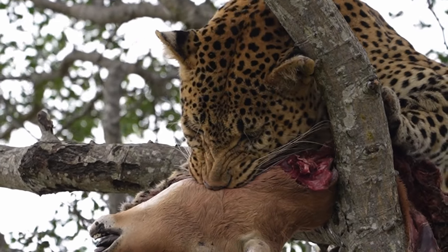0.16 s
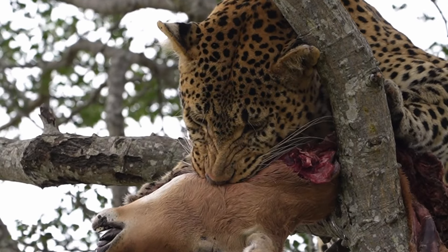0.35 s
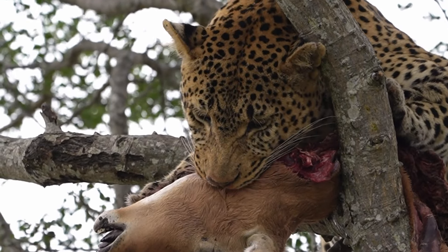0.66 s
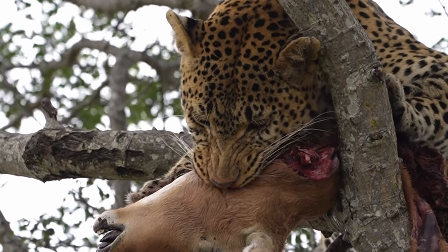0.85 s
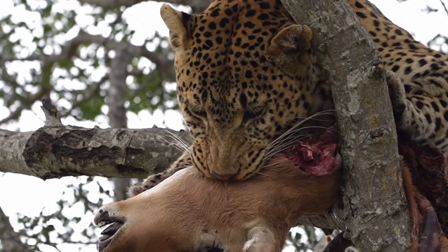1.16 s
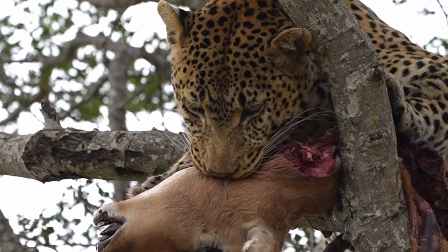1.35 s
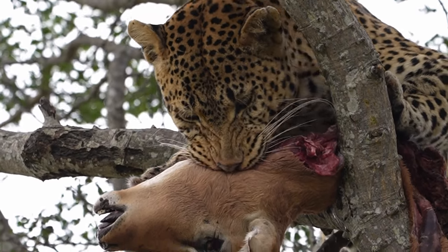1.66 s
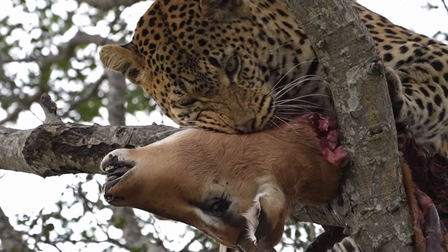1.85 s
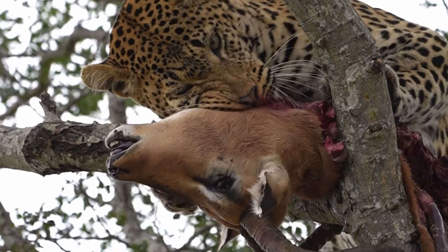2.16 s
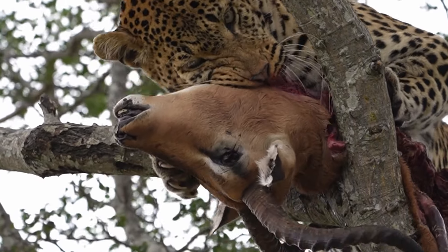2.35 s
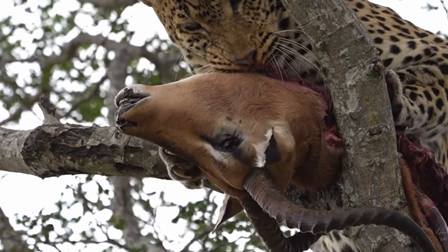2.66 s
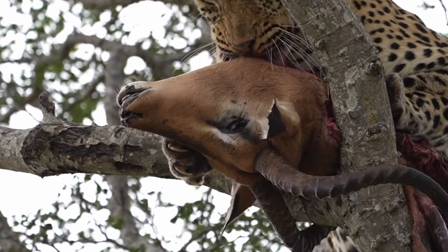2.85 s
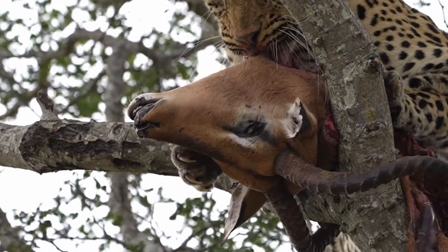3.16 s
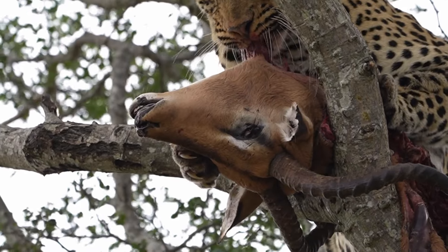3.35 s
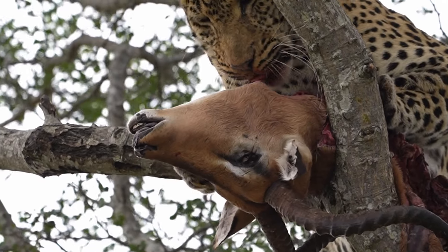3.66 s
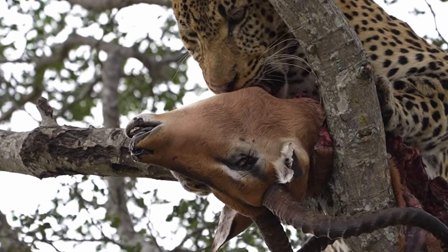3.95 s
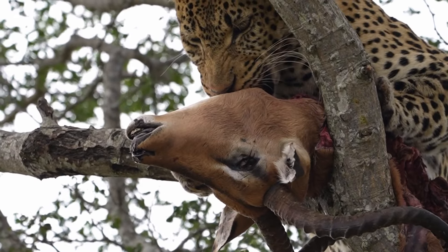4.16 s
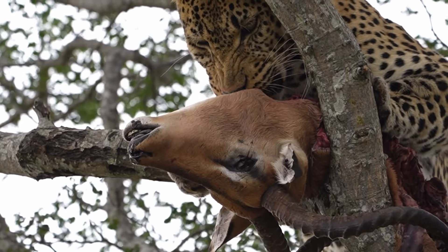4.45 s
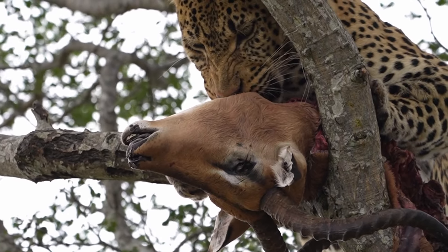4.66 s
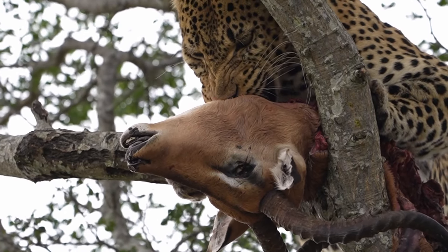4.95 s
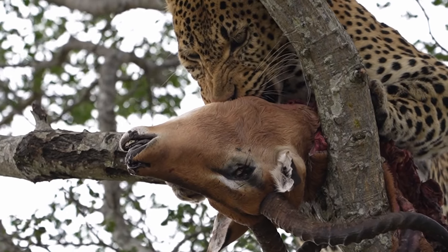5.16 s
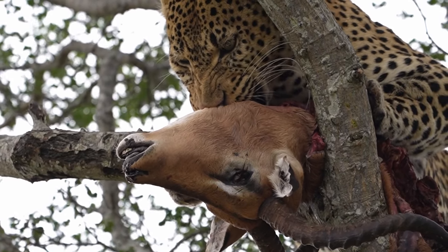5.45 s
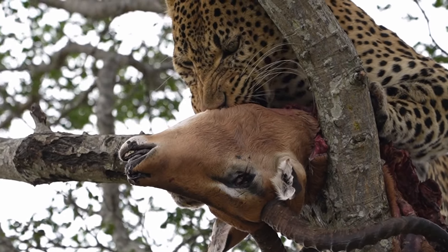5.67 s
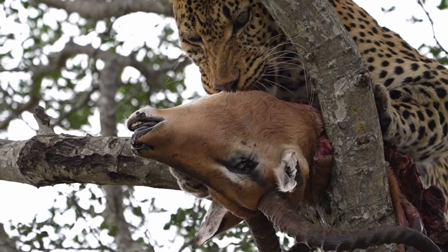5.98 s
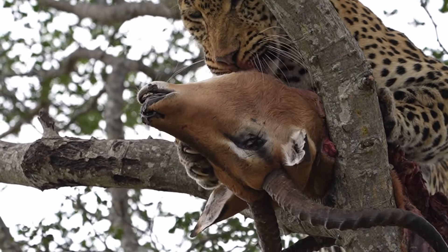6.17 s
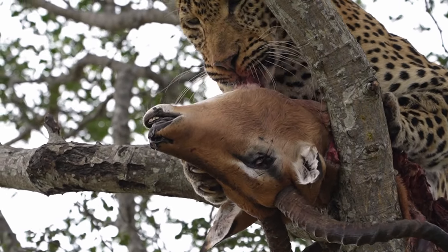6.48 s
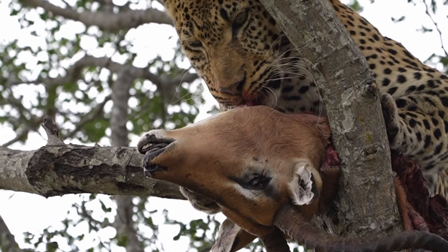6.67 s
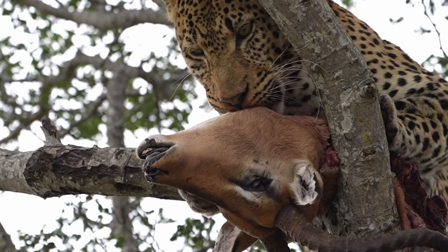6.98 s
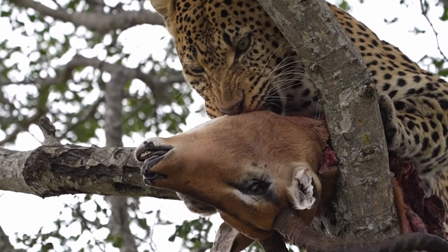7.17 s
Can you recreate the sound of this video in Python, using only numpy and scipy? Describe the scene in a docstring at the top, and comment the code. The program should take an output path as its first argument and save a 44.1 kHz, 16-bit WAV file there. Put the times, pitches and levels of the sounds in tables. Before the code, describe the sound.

Birds scold close by among trees, over a distant cheeping flock and a faint airy hiss that both swell and fade. The first second is loudest: hoarse chattering notes, a short falling nasal wail, harsh churrs and one bright squeak at about 0.5 seconds. Around 1 second, quick sliding notes, hollow clucks and a trill join, followed by a small bird's high chips and a thin whistle. After a brief lull, a second wail falls at 2.2 seconds, then come trills, clucks and rasps until about 3.5 seconds. Two more wails sink one after the other from 3.9 to 5.2 seconds, fraying as they drop, with high chips above. The calls thin out briefly, then thicken near 6 seconds with a last long wail, a whistle, churrs and chatter until about 7.3 seconds. The near calls have a short echo, and the sound has almost no bass.

```python
"""Birds mob a cat in a tree. From the start, close birds chatter over a far scolding flock and airy hiss.
One gives the first of five falling nasal wails; harsh churrs and a squeak follow. Quick slides, clucks
and trills join at about 1 s, then a small bird's high chips and whistles; the calls recur until 7.3 s.
Voiced calls are membrane overtones shaped by throat and beak. Trunks throw a short echo, and the
microphone cuts the bass."""
import sys
import numpy as np
from scipy import signal
from scipy.io import wavfile
from scipy.ndimage import uniform_filter1d

SR = 44100
rng = np.random.default_rng(int(sys.argv[2]) if len(sys.argv) > 2 else 0)


def to_wav(sig):
    """Store sig (one row per channel, or 1-D mono) as 16-bit WAV at the path in sys.argv[1].

    Samples outside -1..1 are clipped; the rate is SR.
    """
    pcm = np.clip(np.atleast_2d(sig), -1, 1) * 32767
    pcm = np.round(pcm).astype(np.int16)
    wavfile.write(sys.argv[1], SR, pcm.T)  # frames by channels


N = 322812

# Throat response for chatter and churrs. Each row: frequency in Hz, gain in dB.
CHATTER_THROAT = [(500, -16.5), (1200, -3), (2500, -3.5), (4000, -5), (6000, -14), (9000, -26),
                  (15000, -81)]


def undb(db):
    """Decibels to gain."""
    return 10 ** (np.asarray(db) / 20)


def unit(x):
    """Scale to rms 1."""
    return x / np.sqrt(np.mean(x ** 2))


def band(x, hz, width_hz):
    """Second-order resonance."""
    return signal.lfilter(*signal.iirpeak(hz, hz / width_hz, fs=SR), x)


def narrow_noise(count, hz, width_hz):
    """Noise passed twice through one resonance; rms 1."""
    return unit(band(band(rng.standard_normal(count), hz, width_hz), hz, width_hz))


def wobble(rate_hz, shape):
    """Smooth random drift at about rate_hz; rms 1."""
    width = max(int(SR / rate_hz), 1)
    return unit(uniform_filter1d(uniform_filter1d(rng.standard_normal(shape), width), width))


def sine(hz):
    """Sine following a per-sample pitch."""
    return np.sin(2 * np.pi * np.cumsum(hz) / SR)


def span(rows):
    """Timed rows to sample indices, per-sample columns and a 2 ms fade at each end."""
    times_s, *columns = np.transpose(rows)
    i = np.arange(int(times_s[0] * SR), min(int(times_s[-1] * SR), N))
    fade = np.clip(np.minimum(i - i[0], i[-1] - i) / (0.002 * SR), 0, 1)
    return i, [np.interp(i / SR, times_s, column) for column in columns], fade


def contour(start_s, length_s, turn, from_hz, turn_hz, to_hz, db, swell_db, beak_hz, beak_db,
            beak_end_hz=None):
    """Rows of one call for voice(): pitch turns once, level tilts by the swell and drops at both ends."""
    u = np.linspace(0, 1, 41)
    hz = np.interp(u, [0, np.clip(turn, 0, 1), 1], [from_hz, turn_hz, to_hz])
    level_db = db + swell_db * (u - .5) - 4.5 * np.abs(2 * u - 1) ** 3.3
    beak_path_hz = np.linspace(beak_hz, beak_end_hz or beak_hz, len(u))
    return np.transpose([start_s + length_s * u, hz, level_db, beak_path_hz, np.full_like(u, beak_db)])


def voice(calls, throat, beak_width_hz, rough, beats=None, fry_hz=1.):
    """Membrane overtones through a fixed throat and a moving beak; roughness shakes pitch and gains."""
    hop = 16  # samples per gain update
    throat_hz, throat_db = np.transpose(throat)
    out = np.zeros(N)
    for n, rows in enumerate(calls):
        i, (hz, *controls), fade = span(rows)
        db, beak_hz, beak_db = uniform_filter1d(controls, size=350)  # muscles cannot jump
        fray = np.clip(rough + (fry_hz / hz) ** 4, 0, .95)  # a slack membrane frays at low pitch
        if beats:  # trill: quick rise, slow fall; the voice thins during the rise
            reference_s, rate_hz, swing = beats[n]
            beat_rad = 2 * np.pi * rate_hz * (i / SR - reference_s)
            hz = hz * (1 + swing * uniform_filter1d(signal.sawtooth(beat_rad - .6 * np.pi, .3), size=150))
            db = db + 5 * np.sin(beat_rad + .3)
        hz = hz * (1 + .12 * fray ** 2 * wobble(350, len(i)))
        k = np.arange(1, int(throat_hz[-1] / hz.min()) + 1)[:, None]
        partial_hz, hoarse = k * hz[::hop], fray[::hop]
        gain = undb(np.interp(np.log(partial_hz), np.log(throat_hz), throat_db, right=-99))
        detune = (partial_hz - beak_hz[::hop]) / beak_width_hz
        gain *= 1 + undb(beak_db[::hop]) / (1 + detune ** 2) ** 1.3
        gain /= np.sqrt(np.sum(gain ** 2, axis=0) / 2)
        gain *= np.sqrt(1 - hoarse ** 2) + hoarse * wobble(hop * 425, gain.shape)
        gain *= undb(2.92 * wobble(hop * 23.4, gain.shape))  # each overtone swells on its own
        gain = uniform_filter1d(np.repeat(gain, hop, axis=1), hop)[:, :len(i)]
        phase_rad = 2 * np.pi * np.cumsum(hz) / SR
        tone = np.sum(gain * np.sin(k * phase_rad + k ** 2), axis=0)
        out[i] += tone * undb(db) * fade
    return out


def chatter():
    """Short hoarse notes, each with one pitch turn."""
    # Each row: start and length in seconds, place of the turn 0-1, pitch at start, turn and end in Hz,
    # level and swell in dB, beak resonance in Hz, its strength in dB.
    notes = [ (0.0, 0.071, 0.72, 1696, 1644, 980, -6.5, -8, 3150, 56),
             (0.17, 0.065, 0.43, 965, 813, 796, -12, -8, 2000, 49),
             (0.22, 0.11, 0.28, 1182, 1005, 793, -13, -7, 2000, 31),
             (0.35, 0.16, 0.55, 768, 975, 967, -20.5, 7, 3000, 30),
             (0.575, 0.085, 0.26, 966, 851, 858, -13, -7, 2600, 22),
             (0.66, .14, 0.72, 908, 1171, 1153, -16.5, 15.5, 3160, 20),
             (0.74, 0.099, 0.4, 1193, 1213, 1190, -18.5, -1, 2420, 8.6),
             (1.19, 0.041, 0.41, 1036, 994, 944, -19, 5, 2500, 21),
             (1.225, .065, 0.308, 900, 927, 962, -23.5, -5, 1930, 5.3),
             (2.43, 0.093, 0.59, 1214, 1186, 1084, -26, -9, 2370, 7.8),
             (3.0, 0.043, 0.63, 1425, 1510, 1430, -26, 5, 3440, 5.2),
             (3.145, 0.049, .55, 1881, 1504, 1470, -17.5, 2, 3350, 10),
             (3.25, 0.042, 0.48, 994, 966, 1025, -21.5, -2, 2900, 15),
             (3.43, .13, 0.28, 1121, 1173, 1190, -23, -20, 2500, 8),
             (3.838, 0.036, 0.59, 606, 605, 610, -23.5, 2, 2730, 18),
             (4.38, .095, .25, 968, 1030, 891, -25, 6, 2430, 5.9),
             (4.84, .07, 0.23, 1115, 1200, 1229, -25.5, 7, 2960, 16),
             (5.41, 0.033, 0.87, 705, 726, 724, -28.5, 0, 2870, 10.3),
             (5.455, 0.036, 0.35, 600, 603, 664, -35, -18, 2380, 3.6),
             (5.62, .16, 0.45, 997, 1221, 1293, -25, 3, 2340, 14),
             (5.79, 0.12, 0.32, 2840, 2800, 2850, -33, -30, 2700, 3),
             (5.825, 0.069, 0.3, 1717, 1720, 1690, -25, 5, 1900, 6.3),
             (6.04, .16, 0.46, 1744, 1648, 1680, -17, -7, 1910, 3.3),
             (6.1, 0.037, 0.53, 1114, 1197, 1222, -20, -23, 1930, 10),
             (6.8, .12, 0.9, 1171, 1177, 1130, -24, -6, 2680, 7.4),
             (6.825, 0.045, 0.38, 1750, 1776, 1910, -24.5, -1, 2550, 16),
             (6.89, 0.1174, 0.51, 3015, 2945, 2930, -17, -3, 2930, 31),
             (6.99, 0.15, 0.55, 1850, 1852, 1920, -34.5, 7, 1860, 16),
             (7.11, .055, .55, 1800, 1760, 1700, -23, 21, 3170, 14),
             (7.165, 0.13, 0.46, 1740, 1777, 1800, -27.5, -4, 1800, 22),
             (7.28, 0.041, 0.64, 1082, 935, 1030, -26, 8, 2100, 18), ]
    return voice([contour(*row) for row in notes], CHATTER_THROAT, beak_width_hz=540, rough=0.334)


def cheeps(low_hz, high_hz, count):
    """Short hoarse tones at random times and pitches, most falling; rms 1."""
    out = np.zeros(N + SR)
    for when, place, glide, length, loudness in rng.random((count, 5)):
        u = np.linspace(0, 1, int((.012 + .04 * length) * SR))
        hz = low_hz * (high_hz / low_hz) ** place * (1 + 0.225 * (glide - .7) * u)
        out[int(when * N):][:len(u)] += undb(8.9 * loudness) * np.sin(np.pi * u) * sine(hz)
    return unit(out[:N] * (1 + 0.5 * wobble(200, N)))


def flock():
    """Far birds: cheeps over the flickering blur of many throats, with a scratchy top."""
    # Each row: time in seconds, level in dB, relative treble level in dB.
    envelope = [(0.0, -19, -5.5), (0.14, -39.5, 14), (0.24, -26.5, 0), (0.57, -25.5, -6.5),
                (0.67, -19.5, -29), (0.77, -31, 0), (0.9, -22.5, 1.5), (1.04, -31.5, -18.5),
                (1.16, -26, -12), (1.3, -32.5, -6), (1.47, -43.5, -34), (1.63, -31, -18),
                (1.81, -45.5, -27), (2.18, -27.5, -6), (2.57, -29, -9), (2.95, -45.5, -10),
                (3.12, -30, 1.5), (3.24, -39.5, -4), (3.35, -22.5, -16), (3.48, -41, 8), (3.61, -46.5, -15),
                (3.9, -38.5, -24), (4.16, -38, 3.5), (4.47, -32.5, -11.5), (4.6, -40.5, 8.5),
                (4.77, -35, -4), (5.16, -43, -1), (5.3, -49, -33), (5.46, -40, -30), (5.55, -44, -18),
                (5.69, -28, -8.5), (5.83, -35, -2), (6.02, -20.5, -12.5), (6.1, -31.5, -6), (6.44, -24, -5),
                (6.77, -27.5, -14), (6.91, -33.5, 5.5), (7.1, -37, -14), (7.32, -30, -14)]
    # Throat resonances. Each row: centre in Hz, width per pass in Hz, relative gain in dB.
    modes = [(760, 236, -2.5), (1250, 1240, 7), (2010, 1860, 11), (3010, 1200, 6.5)]
    flicker_db = 2.5
    blur = sum(undb(gain_db + flicker_db * wobble(25, N)) * narrow_noise(N, hz, width_hz)
               for hz, width_hz, gain_db in modes)
    scratch = narrow_noise(N, 5570, 1400) * undb(flicker_db * wobble(40, N))
    mid = unit(unit(blur) + undb(-1) * cheeps(1250, 3800, count=900))
    treble = unit(unit(scratch) + undb(-4) * cheeps(4700, 6800, count=500))
    i, (db, treble_db), _ = span(envelope)
    out = np.zeros(N)
    out[i] = undb(db) * (mid[i] + undb(treble_db) * treble[i])
    return out


def hiss():
    """Airy treble noise that sinks and swells."""
    # Each row: time in seconds, level in dB.
    envelope = [(0.0, -34), (0.26, -51), (1.55, -50), (1.79, -58), (2.2, -70), (2.55, -49.5), (3.4, -61),
                (3.89, -56), (4.15, -51), (4.54, -73), (4.93, -82), (5.2, -67.5), (5.95, -41.5), (6.4, -69),
                (6.63, -63), (7.18, -50), (7.32, -52)]
    times_s, db = np.transpose(envelope)
    air = band(band(rng.standard_normal(N), 6500, 5700), 12000, 17000)
    return undb(np.interp(np.arange(N) / SR, times_s, db)) * unit(air)


def wails():
    """Falling nasal calls that fray as they sink; the beak resonance grows with loudness."""
    # One curve per wail. Each row: time in seconds, pitch in Hz, level in dB, beak resonance in Hz.
    curves = [
        [(0.06, 987, -15, 2880), (0.082, 910, -12, 2710), (0.106, 673, -10.5, 2670), (0.17, 496, -14, 2300)],
        [(2.17, 1017, -26, 2770), (2.192, 1035, -34, 2800), (2.294, 829, -21.5, 2200),
         (2.312, 787, -23.5, 1740), (2.4, 703, -24.5, 1490), (2.452, 674, -34, 1930), (2.532, 542, -36, 1920),
         (2.614, 480, -25.5, 1670), (2.67, 399, -33.5, 1720)],
        [(3.89, 705, -31, 2110), (3.916, 962, -31.5, 1840), (3.948, 973, -30, 1770), (3.984, 842, -21.5, 1540),
         (4.1, 614, -28.5, 1700), (4.162, 547, -24.5, 2240), (4.246, 496, -21.5, 2580),
         (4.326, 453, -28.5, 2920), (4.348, 385, -29, 3200), (4.452, 319, -35, 2600), (4.48, 325, -40, 2300)],
        [(4.49, 670, -37, 1785), (4.51, 859, -24, 1770), (4.546, 878, -12, 1740), (4.575, 810, -27, 2070),
         (4.612, 729, -17.5, 2270), (4.692, 612, -22.5, 2740), (4.72, 535, -18, 3340),
         (4.828, 454, -23.5, 2880), (4.894, 421, -24, 3000), (4.96, 369, -30.5, 3900),
         (5.002, 326, -28.5, 3800), (5.068, 284, -35, 3460), (5.116, 278, -29.5, 3600), (5.2, 236, -43, 3560)],
        [(6.0, 1161, -18, 2210), (6.03, 1026, -22, 2340), (6.074, 940, -16, 2080), (6.182, 663, -24, 2450),
         (6.27, 549, -22, 3530), (6.368, 465, -18, 3560), (6.44, 406, -21, 4260), (6.5, 352.8, -22, 4340),
         (6.6, 299, -25, 4470), (6.674, 267, -28.5, 4270), (6.72, 270, -30, 4400), (6.83, 229, -30.5, 4230),
         (6.88, 240, -42, 3960)],
    ]
    # Beak strength of each wail in dB, at the level reference_db.
    strengths_db = [14, 24.5, 23, 10.6, 7.5]
    # Throat response. Each row: frequency in Hz, gain in dB.
    throat = [(290, -64), (500, -15.5), (1730, 2), (2570, 2), (2980, -4), (3550, 6), (5400, -0.5),
              (5800, -16), (6720, -1), (8000, -51), (10400, -59), (17600, -120)]
    reference_db, beak_db_per_db = -26, 1.5
    calls = [[(time_s, hz, db, beak_hz, beak_db + beak_db_per_db * (db - reference_db))
              for time_s, hz, db, beak_hz in curve] for curve, beak_db in zip(curves, strengths_db)]
    return voice(calls, throat, beak_width_hz=460, rough=.12, fry_hz=160)


def churrs():
    """Harsh rasps: a very rough voice on one pitch under a strong, gliding beak resonance."""
    # Each row: start and length in seconds, level and swell in dB, beak resonance at start and end in Hz.
    rasps = [(0.25, .25, -19.5, 1, 3420, 3130), (0.82, 0.11, -18.5, -16, 2940, 2580),
             (1.969, 0.17, -36, 0, 2720, 2750), (2.16, 0.27, -24.5, 3, 2730, 2800),
             (3.019, .18, -24.5, -3, 3300, 3280), (3.289, .18, -17.5, 0.5, 3090, 3120),
             (4.35, 0.1, -23.5, -1, 3180, 3150), (6.26, 0.17, -22, -4, 2840, 3100),
             (6.46, 0.16, -19, -4.5, 2950, 3000), (6.669, 0.085, -24, 2, 2860, 2720),
             (6.759, 0.18, -19.5, -5.5, 2580, 2880), (7.115, 0.06, -22.5, -1, 3250, 3220),
             (7.18, 0.056, -30, -4, 2900, 2710)]
    hz, beak_db = 996, 35
    calls = [contour(start_s, length_s, .5, hz, hz, hz, db, swell_db, beak_hz, beak_db, beak_end_hz)
             for start_s, length_s, db, swell_db, beak_hz, beak_end_hz in rasps]
    return voice(calls, CHATTER_THROAT, beak_width_hz=800, rough=1.0)


def squeak():
    """One bright, nearly clean call that leaps up and drops back."""
    # Each row: time in seconds, pitch in Hz, level in dB, beak resonance in Hz, its strength in dB.
    curve = [(.535, 1060, -25, 3780, 14), (.545, 1740, -13.5, 3700, 16), (.558, 1925, -26, 3800, -2),
             (.567, 1906, -11.5, 3800, 0), (.585, 1209, -35, 3800, 5)]
    # Throat response. Each row: frequency in Hz, gain in dB.
    throat = [(900, 6), (4000, -4), (7800, 1), (10000, -10.5)]
    return voice([curve], throat, beak_width_hz=550, rough=0.096)


def slides():
    """Single tones that glide fast, slightly hoarse."""
    # Each row: start and length in seconds, pitch at start and end in Hz, level in dB.
    glides = [(0.783, 0.0438, 3460, 2780, -12), (0.854, 0.037, 2900, 2080, -18.5),
              (0.86, 0.056, 1854, 1243, -24), (0.921, 0.028, 1110, 1460, -23.5),
              (1.081, 0.023, 2950, 3000, -23), (1.145, 0.011, 3840, 3160, -17),
              (1.151, 0.013, 3120, 3400, -14), (1.167, 0.01, 3380, 2350, -15),
              (1.175, 0.022, 2450, 2190, -17), (2.208, .012, 1890, 2900, -33),
              (2.213, 0.037, 1940, 3070, -24), (2.244, 0.048, 1783, 2855, -29),
              (2.27, 0.035, 1940, 2680, -37), (2.499, 0.024, 4750, 4480, -31),
              (2.698, 0.0098, 2290, 1500, -21.5), (3.043, 0.063, 1506, 1980, -30.5),
              (3.094, 0.082, 2820, 3387, -14.5), (3.767, 0.034, 3600, 4250, -50),
              (4.545, 0.048, 3170, 3080, -24), (5.854, 0.089, 5050, 4530, -33),
              (5.859, 0.019, 2070, 2020, -22), (6.036, 0.017, 3014, 3870, -16),
              (6.048, 0.05, 2980, 2825, -14.5), (6.079, 0.0079, 4100, 2900, -15),
              (6.701, 0.028, 2740, 2560, -20), (6.235, .025, 3490, 3270, -33),
              (6.6, 0.048, 1520, 1245, -29), (5.655, 0.01, 1510, 1820, -28.5),
              (6.188, 0.013, 3250, 3210, -21.5)]
    out = np.zeros(N)
    for start_s, length_s, from_hz, to_hz, db in glides:
        u = np.arange(int(length_s * SR)) / (length_s * SR)
        envelope = np.sin(np.pi * u) ** .5 * (1 + 0.53 * wobble(250, len(u)))
        tone = np.sqrt(2) * sine(from_hz + (to_hz - from_hz) * u)
        out[int(start_s * SR):][:len(u)] += undb(db) * envelope * tone
    return out


def clucks():
    """Short hollow knocks that ring the throat."""
    # Each row: start in seconds, level in dB, pitch in Hz, 60 dB decay time in seconds.
    knocks = [(1.009, -12, 1480, 0.012), (1.03, -15, 1520, 0.014), (1.053, -14, 1600, 0.024),
              (1.084, -20, 2970, 0.019), (2.901, -19.5, 680, 0.028), (2.946, -19, 760, 0.013),
              (2.986, -23, 1360, 0.016), (3.02, -11.5, 3220, 0.017), (3.695, -27.5, 1500, 0.033),
              (3.822, -24.5, 2820, 0.019), (5.584, -25, 2800, 0.024)]
    t = np.arange(int(.05 * SR)) / SR
    out = np.zeros(N)
    for start_s, db, hz, t60_s in knocks:
        envelope = np.minimum(t / 0.00069, 1) * undb(-60 * t / t60_s)
        out[int(start_s * SR):][:len(t)] += undb(db) * envelope * np.sin(2 * np.pi * hz * t)
    return out


def trills():
    """Hoarse notes whose pitch and level beat rapidly."""
    # Each row: ten columns as in chatter(), beat reference time in seconds, beat rate in Hz,
    # pitch swing as a fraction.
    notes = [ (1.075, .195, 0.32, 1412, 1157, 1115, -22.5, -3.5, 1800, 27, 1.102, 38.9, 0.017),
             (1.52, 0.21, 0.25, 865, 766, 753, -37.5, 7.5, 1550, 3.6, 1.66, 24.7, 0.1),
             (2.5, .19, 0.88, 816, 790, 917, -34, 2, 1790, 53, 2.55, 36.5, .05),
             (2.7, .2, 0.13, 1594, 1050, 924, -28.5, -7, 1600, 51, 2.748, 45.2, 0.081),
             (5.87, 0.21, 0.16, 1430, 1018, 1048, -24.5, -9.5, 2030, 9.7, 5.912, 39, 0.034), ]
    # Throat response. Each row: frequency in Hz, gain in dB.
    throat = [(500, -2.5), (1100, -8.5), (2200, -13), (3200, -4.5), (5000, -23)]
    calls = [contour(*row[:10]) for row in notes]
    return voice(calls, throat, beak_width_hz=530, rough=0.323, beats=[row[10:] for row in notes])


def chips():
    """High bursts of narrow-band scratch, each with a skirt that slides down."""
    # Each row: start in seconds, relative level in dB, centre in Hz, length in seconds.
    bursts = [(1.265, -13.5, 6720, 0.024), (2.386, -19, 6450, 0.039), (2.459, -18, 6600, 0.024),
              (2.57, -15, 6440, 0.019), (3.976, -17.5, 6520, 0.04), (4.134, -21.5, 6520, 0.058),
              (4.221, -19.5, 6450, 0.038), (4.365, -13.5, 6810, 0.031), (4.45, -19, 6700, 0.018)]
    out = np.zeros(N)
    for start_s, db, hz, length_s in bursts:
        u = np.arange(int(length_s * SR)) / (length_s * SR)
        core = narrow_noise(len(u), hz, width_hz=710)
        skirt = wobble(1200, len(u)) * sine(hz * (1 - 0.52 * u))
        envelope = 0.39 * np.minimum(u / 0.18, 1) * (1 - u) ** 0.5
        out[int(start_s * SR):][:len(u)] += undb(db) * envelope * (core + undb(-2.5) * skirt)
    return out


def whistles():
    """Thin high sines that swing up to their top and sag slowly."""
    # Each row: start and length in seconds, top pitch in Hz, level in dB.
    notes = [(1.464, 0.14, 6810, -25.5), (2.976, 0.16, 6820, -28), (5.38, 0.13, 6700, -51),
             (6.03, 0.11, 6960, -22.5)]
    rise_s, release_s, rise_hz, sag_hz_per_s, edge_db = 0.0173, .01, 267, 4600, -10
    out = np.zeros(N)
    for start_s, length_s, top_hz, db in notes:
        end_s = start_s + length_s
        low_hz = top_hz - sag_hz_per_s * (length_s - rise_s - release_s)
        curve = [(start_s, top_hz - rise_hz, db + edge_db), (start_s + rise_s, top_hz, db),
                 (end_s - release_s, low_hz, db), (end_s, low_hz, db + edge_db)]
        i, (hz, level_db), fade = span(curve)
        out[i] += np.sqrt(2) * undb(level_db) * fade * sine(hz)
    return out


def trunk_echo(x, t60_s):
    """Dense reflections off trunks: a decaying noise response of unit energy."""
    t = np.arange(int(.5 * SR)) / SR
    response = rng.standard_normal(len(t)) * np.minimum(t / 0.0057, 1) * undb(-60 * t / t60_s)
    return signal.fftconvolve(x, response / np.sqrt(np.sum(response ** 2)))[:N]


def scene():
    """Near birds with their echo, the far flock and the hiss; mono."""
    near = chatter() + wails() + churrs() + squeak() + slides() + clucks() + trills() + chips() + whistles()
    return (near + undb(-7.5) * trunk_echo(near, t60_s=0.17) + flock() + hiss())[None]


def record(dry):
    """Loudest peaks softly rounded; then steep bass cut, faint uneven rumble, top cut."""
    bass_cut_hz, top_cut_hz, rumble_db, sway_db = 570, 15730, -69.5, 5
    highpass = signal.ellip(7, .5, 50, bass_cut_hz, "high", fs=SR, output="sos")
    lowpass = signal.ellip(10, .2, 70, top_cut_hz, fs=SR, output="sos")
    thin = signal.sosfilt(highpass, np.tanh(0.87 * dry) / 1.212)
    rumble = sum(undb(db + sway_db * wobble(4.7, N)) * unit(band(rng.standard_normal(N), hz, 2 * hz))
                 for hz, db in [(35, -5.5), (110, 0), (260, -18)])
    return signal.sosfilt(lowpass, thin + undb(rumble_db) * unit(rumble))


dry = scene()
out = record(dry)
to_wav(out)
```